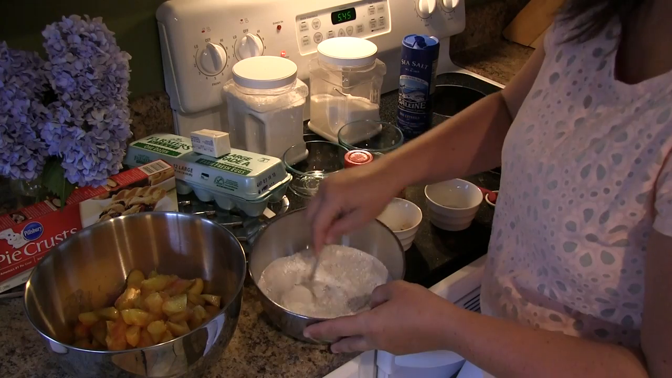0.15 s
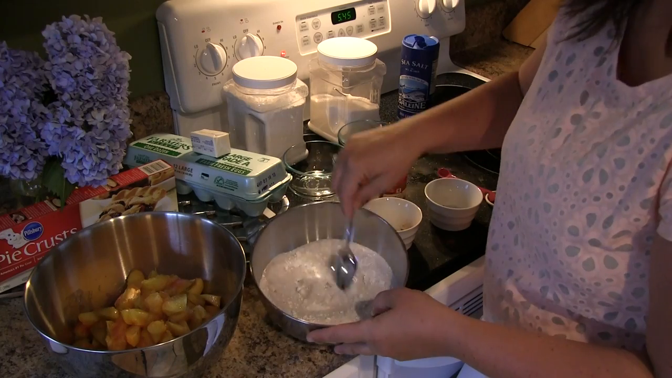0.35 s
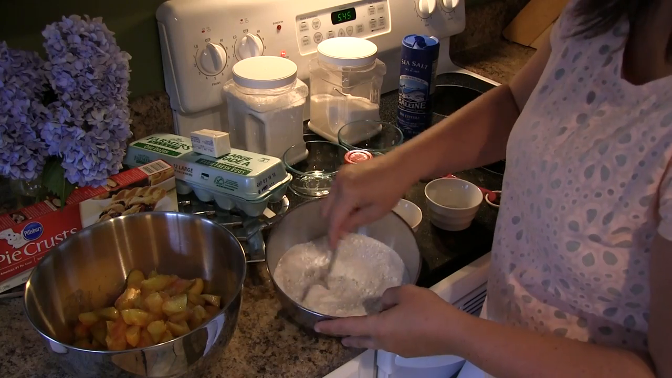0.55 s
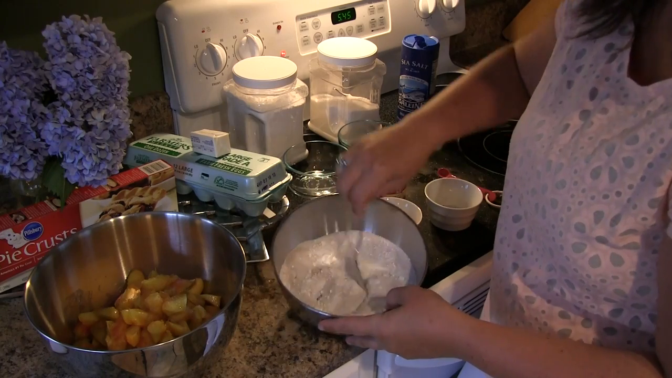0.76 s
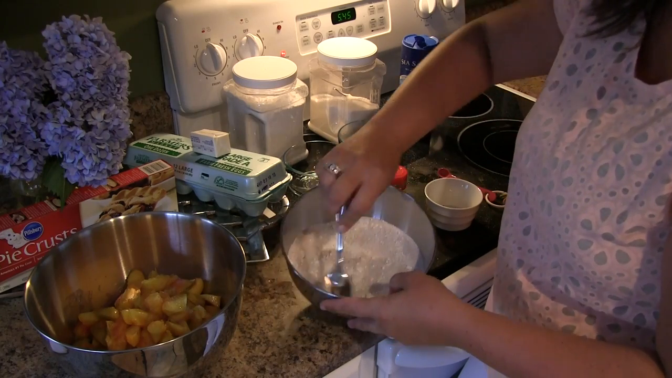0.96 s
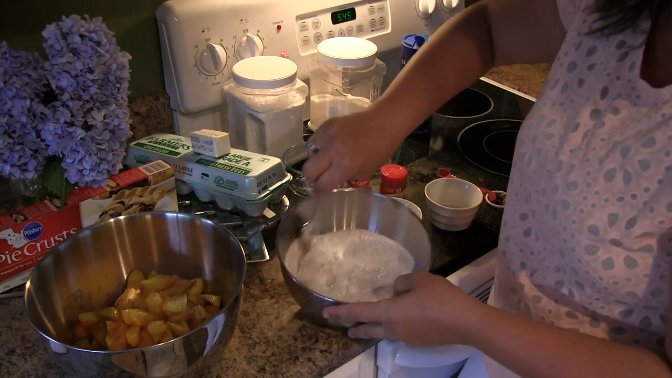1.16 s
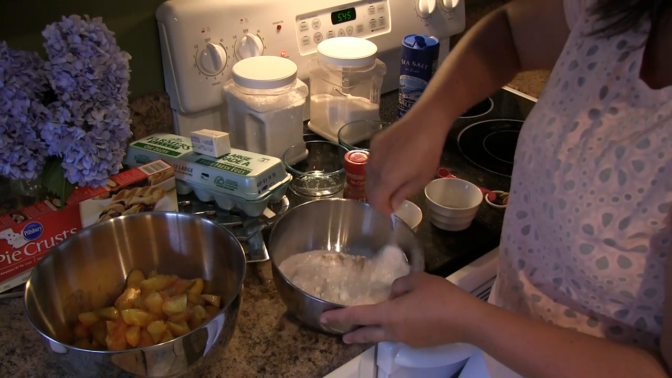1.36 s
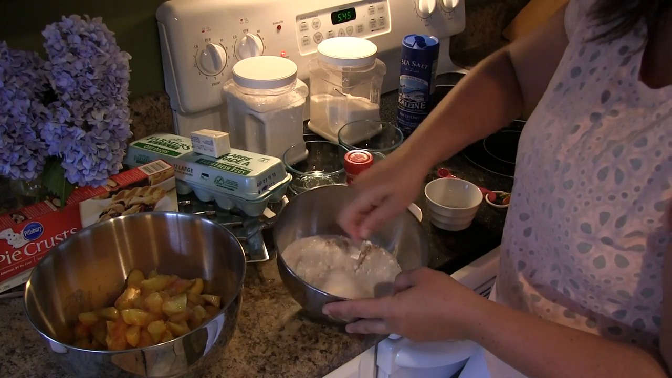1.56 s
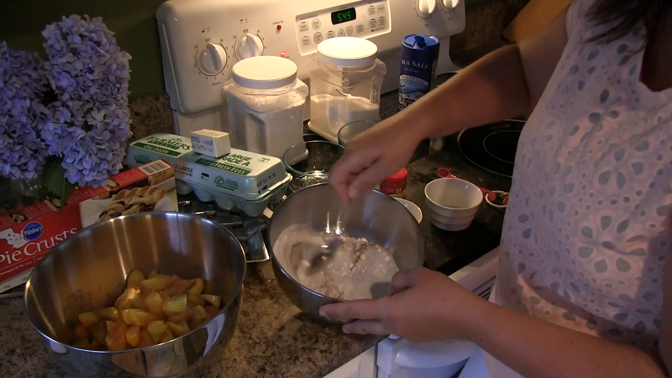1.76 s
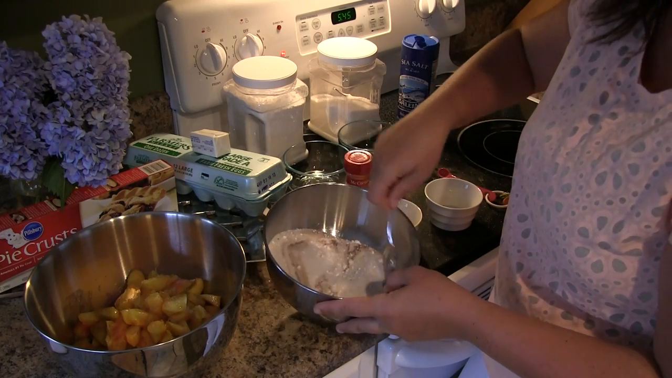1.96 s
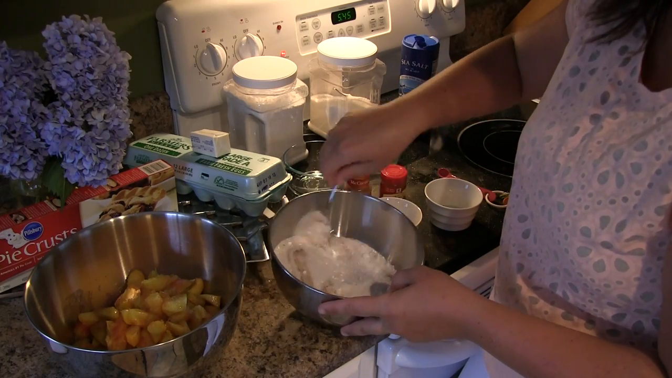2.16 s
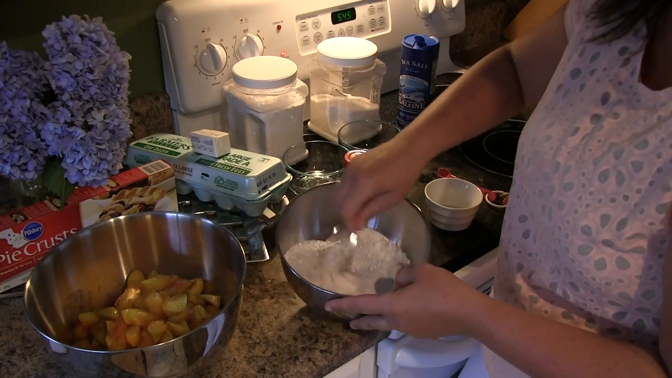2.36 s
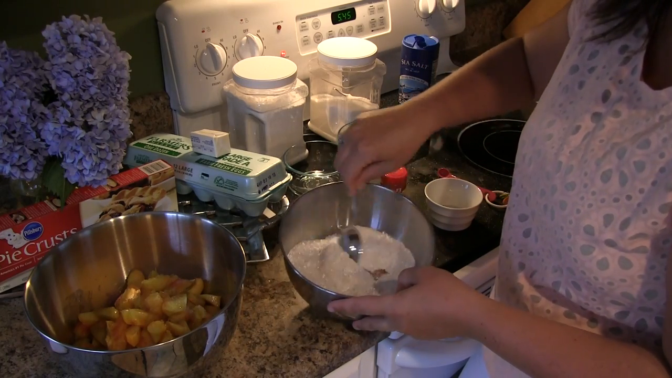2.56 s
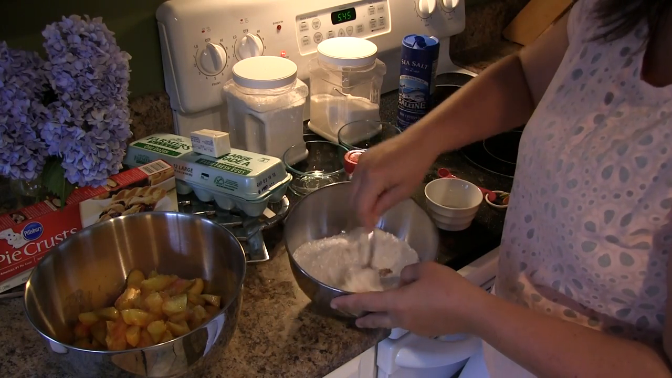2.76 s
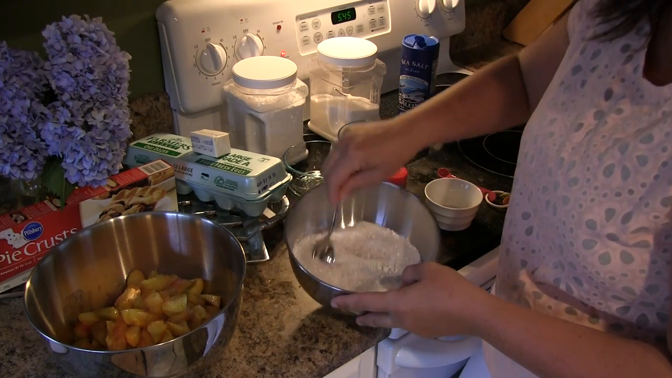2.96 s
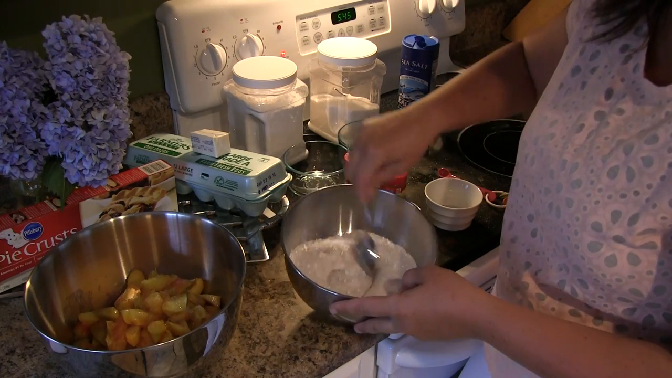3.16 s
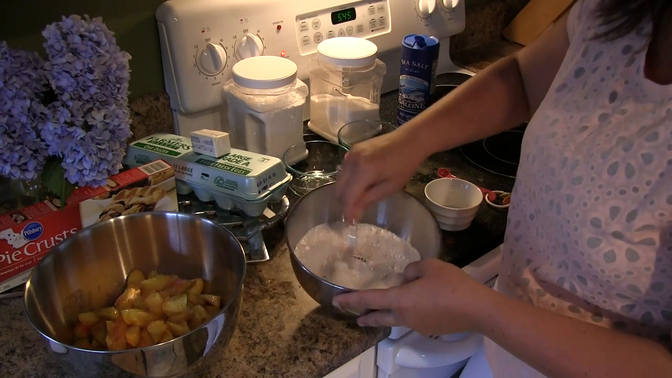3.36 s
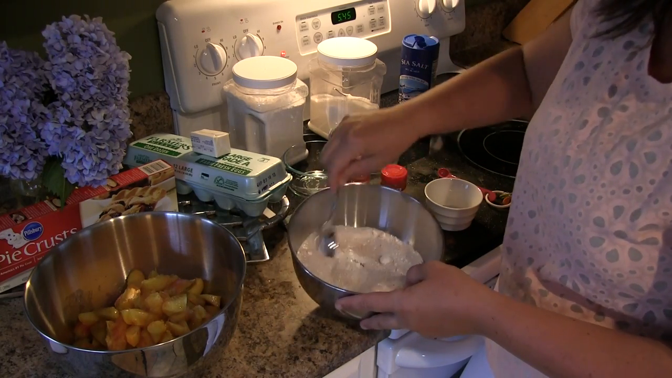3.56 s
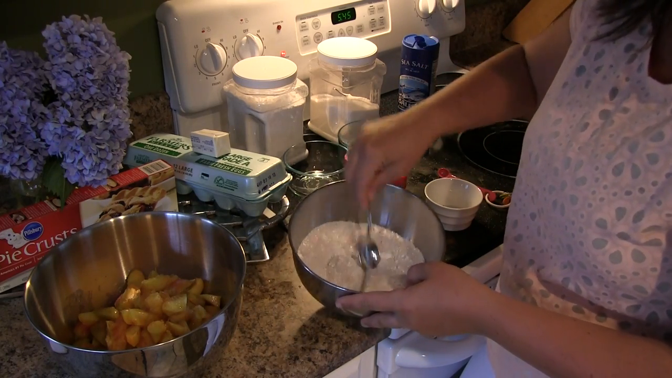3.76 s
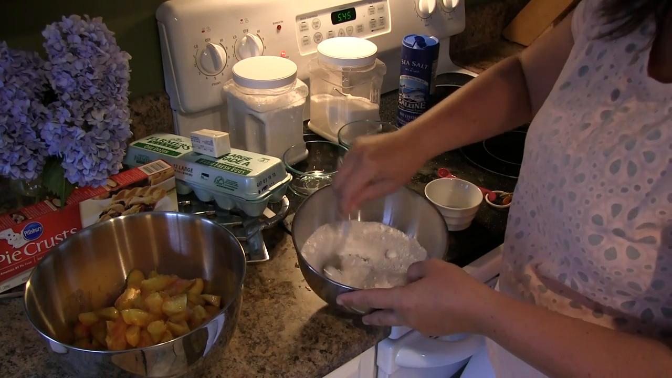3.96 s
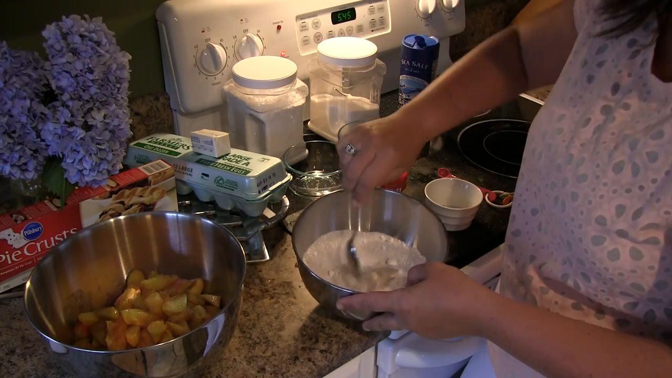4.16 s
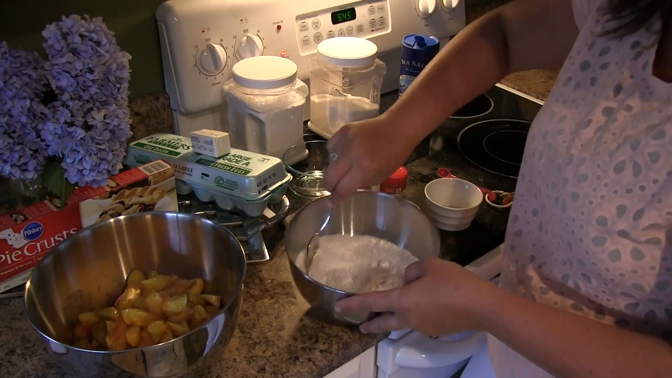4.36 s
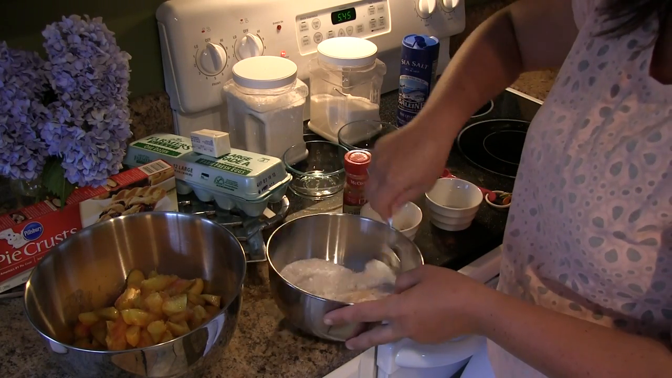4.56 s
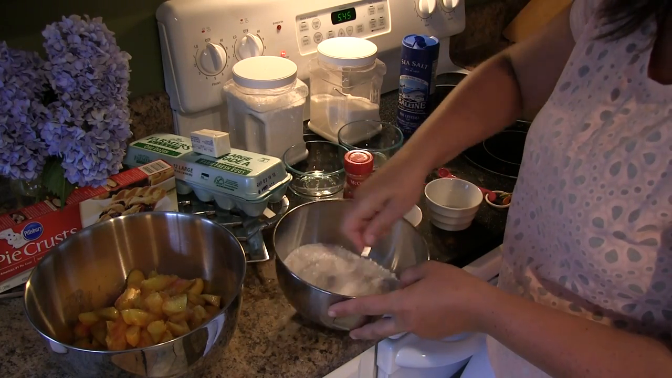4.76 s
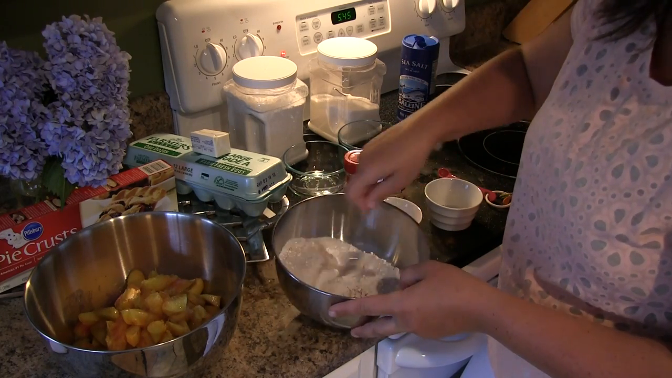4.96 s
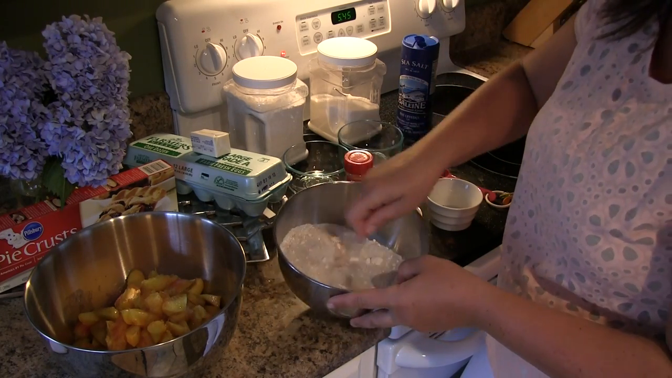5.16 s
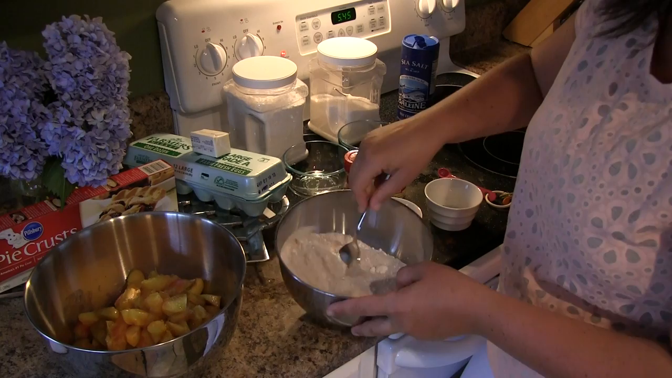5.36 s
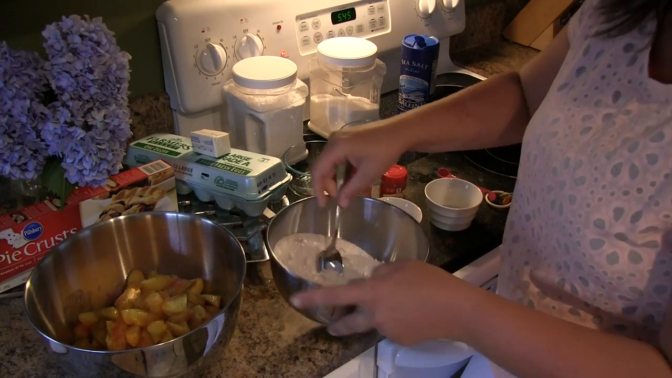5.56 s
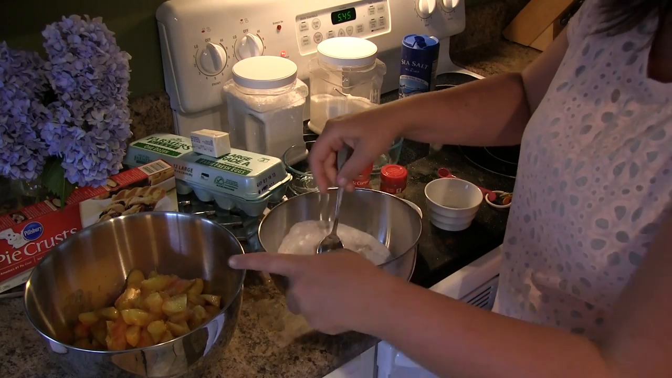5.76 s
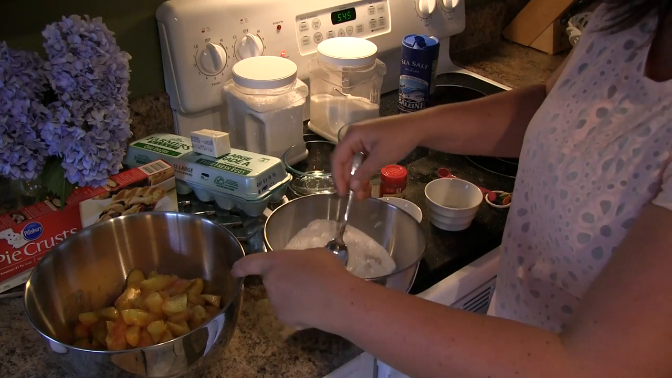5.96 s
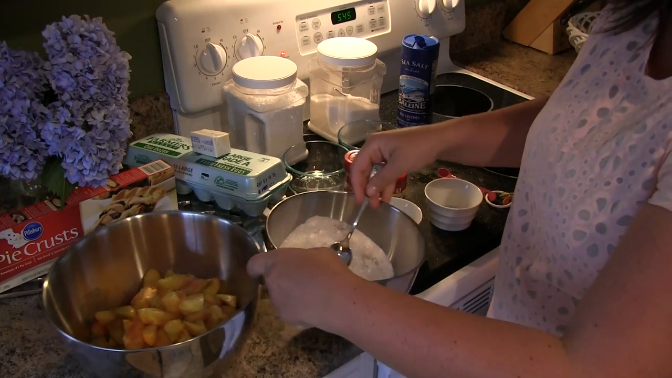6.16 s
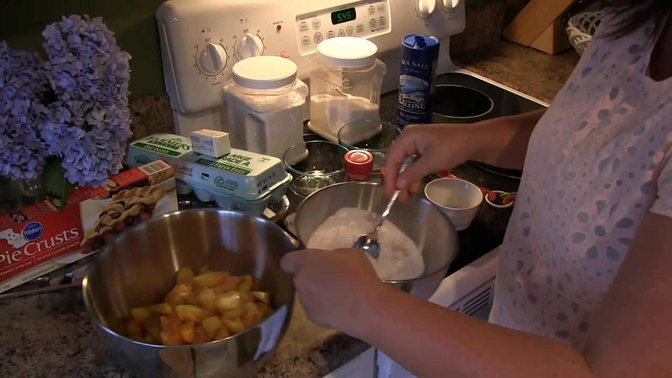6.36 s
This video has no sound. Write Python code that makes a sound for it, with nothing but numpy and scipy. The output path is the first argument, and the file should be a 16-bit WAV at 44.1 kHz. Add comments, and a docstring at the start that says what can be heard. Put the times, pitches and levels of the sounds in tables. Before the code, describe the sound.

Close in a quiet kitchen, a metal spoon stirs dry flour and sugar in a steel bowl. Quick gritty scrapes mix with sharp clinks and short bursts of bright, singing steel on steel. The strokes thin out after five seconds, a few faint ticks remain, then a larger bowl is softly nudged and dragged over the stone counter.

```python
"""In a quiet kitchen a metal spoon scrapes round a steel bowl of flour and sugar.
Snapping sugar grit and sharp catches of the spoon's edge excite damped modes of bottom, wall and edge.
Where steel slides bare on steel, stick-slip noise feeds clear partials and the bowl sings.
At the end a larger bowl is nudged (decaying low sines) and dragged over stone (coloured friction noise).
A diffuse room tail and a faint noise hush lie behind."""
import sys
import numpy as np
from scipy import signal
from scipy.fft import rfft, irfft
from scipy.io import wavfile
from scipy.ndimage import uniform_filter1d

SR = 44100
rng = np.random.default_rng(int(sys.argv[2]) if len(sys.argv) > 2 else 0)


def unload_wav(signal):
    """Save mono or channel-first audio to the path in sys.argv[1] as 16-bit WAV at rate SR, clipped to [-1, 1]."""
    wavfile.write(
        sys.argv[1],
        SR,
        np.round(np.clip(np.atleast_2d(signal).T, -1, 1) * 32767).astype(np.int16),
    )


N = 286650
TIME = np.arange(N) / SR  # s

# Spoon strokes: touch t/s, hardest t/s, ease-off t/s, then relative force at the hardest point
# on bottom level/dB, wall level/dB, grit level/dB
STROKE_FORCES = [(0, 0.062, 0.18, -26, -21, -33), (0.246, 0.337, 0.51, -38.5, -26, -40),
                 (0.386, 0.524, 0.61, -24.5, -21.5, -31.5), (0.633, 0.683, 0.79, -35.5, -31.5, -41),
                 (0.804, 0.86, 0.91, -36.5, -30, -52), (1.093, 1.1, 1.273, -32.5, -37, -24),
                 (1.274, 1.34, 1.7, -46.5, -31, -30.5), (1.61, 1.77, 1.786, -43, -47, -40.5),
                 (1.782, 1.811, 1.94, -72, -70, -49.5), (2.042, 2.05, 2.117, -27, -48, -23),
                 (2.133, 2.228, 2.35, -45, -22, -33), (2.273, 2.33, 3.08, -41.5, -36, -39.5),
                 (2.533, 2.593, 2.73, -42.5, -25.5, -33.5), (2.633, 2.667, 2.776, -42, -21.5, -28.5),
                 (2.8, 2.81, 2.93, -38, -34, -37.5), (2.863, 2.931, 3, -35, -23.5, -35.5),
                 (2.953, 3.01, 3.11, -33, -28.5, -28), (3.173, 3.198, 3.37, -37, -27.5, -37),
                 (3.235, 3.317, 3.38, -39, -33, -30), (3.397, 3.49, 3.54, -44.5, -36, -42),
                 (3.53, 3.572, 3.67, -34, -21.5, -31), (3.605, 3.642, 3.64, -47, -32.5, -30.5),
                 (3.71, 3.824, 3.9, -44, -32.5, -40.5), (3.856, 3.885, 3.98, -36.5, -24.5, -30),
                 (3.94, 3.974, 3.9, -57, -39, -31), (4.049, 4.154, 4.12, -49, -39, -41.5),
                 (4.386, 4.387, 4.42, -22, -33, -26.5), (4.446, 4.477, 4.97, -40.5, -24.5, -43),
                 (4.577, 4.602, 4.9, -49.5, -43.5, -30), (4.846, 4.944, 5.16, -40.5, -58, -41.5),
                 (5.051, 5.13, 5.21, -32.5, -28.5, -35), (5.265, 5.28, 5.42, -29, -30.5, -43),
                 (5.597, 5.63, 5.7, -40.5, -41.5, -53.5)]
# Force at touch and at ease-off, below the hardest point (dB); how fast contact begins and ends (s)
LEAN_IN_DB, EASE_DB, TOUCH_S, LIFT_S = -7.5, -14.5, 0.0062, 0.073
# Spans in which the spoon stays in the mix between strokes: dips in t/s, lifts out t/s
IMMERSIONS = [(0, 0.86), (1.096, 1.44), (2.04, 4.19), (4.39, 5.49)]
# Resting drag of the spoon: bottom level/dB, wall level/dB, grit level/dB
RESTING_FORCE = (-52, -44.5, -48)
# Edge catches and knocks: t/s, strength level/dB, brightness level/dB
EDGE_CATCHES = [(0.025, -8, -11.5), (0.036, -8.5, -9), (0.058, -6, -3.5), (0.071, -10.5, 0),
                (0.085, -12, 5), (0.11, -10, 5.5), (0.153, -19.5, 7), (0.251, -26, -2), (0.268, -23, 0.5),
                (0.299, -15.5, 5.5), (0.343, -19.5, 3), (0.38, -9.5, 4), (0.404, -21, -2),
                (0.456, -15, 5.5), (0.485, -8, -4), (0.524, -9, 0.5), (0.55, -7, 7), (0.582, -22, 1),
                (0.724, -23, 0.5), (0.832, -24, 0), (1.096, -8, 26), (1.148, -9, 12.5), (1.205, -18.5, 5),
                (1.236, -23, 2.5), (1.299, -18.5, 9), (1.323, -6, 12), (1.342, -5, 20), (1.366, -9, 18),
                (1.394, -8.5, 5.5), (1.409, -11.5, 14), (1.446, -9, 14), (1.483, -16, 15), (1.528, -30, 6),
                (1.557, -16.5, 12), (2.038, -5, 3.5), (2.074, -15, 14), (2.088, -14.5, 9), (2.243, -7.5, 7),
                (2.252, -15, 11.5), (2.393, -19, -1), (2.44, -21, -2.5), (2.509, -19.5, 13),
                (2.555, -16.5, 0), (2.593, -21.5, -2), (2.605, -14, 2), (2.629, -20, 6),
                (2.653, -11.5, 5.5), (2.662, -13, 4), (2.679, -18, 8), (2.699, -15, 0.5),
                (2.737, -11, -8.5), (2.795, -10.5, -12.5), (2.907, -15, 0), (2.92, -8, -2.5),
                (2.947, -12.5, 2.5), (3.004, -12.5, 4.5), (3.031, -7.5, -6.5), (3.065, -12.5, -16),
                (3.081, -14, -12), (3.131, -14.5, -5), (3.182, -18, 5), (3.235, -16, 2), (3.338, -10.5, 11),
                (3.55, -20, -2), (3.568, -8, 1), (3.613, -18.5, 14), (3.861, -17.5, -1), (3.884, -7.5, 0),
                (3.909, -10, 20), (4.159, -20.5, -1), (4.202, -15.5, -8), (4.392, -8, 4), (4.592, -8.5, 8),
                (4.692, -28, 12), (4.922, -23.5, -21), (5.009, -14.5, -5.5), (5.115, -13, 5),
                (5.137, -13.5, -0.5), (5.189, -21, -8), (5.271, -18.5, 0), (5.421, -22.5, -7),
                (5.432, -20.5, -9), (5.632, -20, -9), (5.659, -30, -2), (5.793, -31.5, -11),
                (5.859, -35, -9.5), (6.419, -23.5, 1.5)]
# How well a catch of brightness 0 passes into bottom, wall and edge: level/dB each, before normalising
CATCH_COUPLING = (-4.5, -1.5, -7.5)
# Brighter catches favour the edge, duller ones the bottom: change for bottom, wall, edge [dB per dB]
BRIGHTNESS_SLOPE = (-1.02, 0, 1.17)
# Damped modes of the bowl bottom: f/Hz, width f/Hz, level/dB
BOTTOM_MODES = [(220, 380, -7), (510, 110, -6), (620, 90, -1.5), (715, 90, 1.5), (816, 80, -3),
                (920, 120, -6), (1170, 110, -2), (1275, 80, -1.5), (1446, 130, -2.5)]
# Damped modes of the bowl wall: f/Hz, width f/Hz, level/dB
WALL_MODES = [(1640, 200, -8), (1935, 286, -3.5), (2190, 160, -6.5), (2296, 154, -4.5), (2480, 480, -1),
              (2816, 145, -2.5), (3020, 180, -6), (3247, 270, -5.5), (4100, 600, -7), (4750, 340, -9),
              (6430, 1130, -9)]
# Damped modes of the spoon edge: f/Hz, width f/Hz, level/dB
EDGE_MODES = [(7850, 1200, 0), (8300, 260, -3.5), (9210, 860, 9), (10050, 140, -3.5), (10400, 360, -7.5),
              (11450, 160, -2.5), (13380, 470, -3)]
# Spectrum of the crunch heard directly: f/Hz, level/dB per Hz
GRIT_SPECTRUM = [(3000, -18.5), (4500, -9.5), (6000, -12), (9000, -4.5), (13000, -11), (16000, -16.5)]
# Passages of bare steel on steel, each with rows: t/s, gliding partial level/dB, its pitch f/Hz,
# low fixed partials level/dB, high fixed partials level/dB
SINGING_PASSAGES = [
    [(1.095, -50, 2150, -42, -40), (1.154, -46, 2030, -39, -45), (1.25, -38, 2380, -48, -41),
     (1.29, -47, 2380, -52, -42), (1.33, -42, 2000, -43, -41), (1.41, -42, 2080, -41, -45),
     (1.48, -39, 2250, -43, -43), (1.554, -40, 2120, -46, -54), (1.62, -60, 2100, -58, -62)],
    [(2.037, -44, 2040, -36, -50), (2.094, -26, 2040, -38, -50), (2.13, -48, 2040, -47, -55),
     (2.28, -42, 2200, -48, -54), (2.5, -45, 2280, -48, -56)],
    [(4.392, -46, 2300, -35, -45), (4.43, -49, 2150, -44, -54), (4.488, -38, 2180, -44, -54),
     (4.57, -47, 1980, -46, -50), (4.69, -41, 2250, -44, -40), (4.748, -36, 2160, -50, -43),
     (4.86, -55, 2070, -55, -58)],
]
# Low fixed partials of the singing: f/Hz, width f/Hz, level/dB
LOW_PARTIALS = [(690, 100, 1), (1290, 90, -3), (1400, 80, 0), (2860, 80, -2), (3800, 120, -9)]
# High fixed partials of the singing: f/Hz, width f/Hz, level/dB
HIGH_PARTIALS = [(4800, 110, 0), (5050, 130, -2), (7100, 250, -6)]
# Free ring of the spoon, a row for each pitch: level/dB, t60/s
SPOON_RING = [(-20, 0.56), (-9.5, 0.024), (-34.5, 0.13)]
# Pitches of that ring: f/Hz each
SPOON_PITCHES = (2848, 620, 240)
RING_S, RING_END_S = 2.795, 2.925  # the spoon strikes the wall and rings until it touches again
# Thumps of the counter under the nudged bowl: t/s, level/dB, t60/s
COUNTER_THUMPS = [(6.024, -40, 0.23), (6.109, -49, 0.41), (6.429, -34.5, 0.2)]
NUDGE_HZ = 102
# Sliding of the larger bowl: t/s, level/dB
DRAG_LEVEL = [(6.13, -63), (6.16, -50.5), (6.27, -38), (6.5, -34.5)]
# Spectrum of that sliding: f/Hz, level/dB per Hz
DRAG_SPECTRUM = [(35, -32), (130, -11), (540, 1.5), (770, -3.5), (860, -11.5), (2200, -24.5), (2660, -13.5),
                 (3700, -25.5), (4750, -23.5), (5600, -24.5), (12000, -42.5)]
# Spectrum of the kitchen hush: f/Hz, level/dB per Hz
HUSH_SPECTRUM = [(15, -61), (30, 2), (58, 3), (135, 1.5), (260, -8.5), (450, -3.5), (1000, -12.5),
                 (3000, -16), (6000, -23.5), (12000, -23), (16500, -29)]
HUSH_DB, BAND_LIMIT_HZ = -56, 15950


def stirring():
    """Forced vibration: crunch and catches drive the bowl bottom, the wall, the spoon edge and the air."""
    bottom_force, wall_force, grit_force = strokes()
    thud, knock, tick = catches()
    # 1 where no flour lies between spoon and bowl
    bare = sum((TIME > table[0][0]) & (TIME < table[-1][0]) for table in SINGING_PASSAGES)
    muffled = 1 - .75 * uniform_filter1d(1. * bare, size=1500)

    # All four crunches share one slip pattern; edge and air add a finer one
    shared = slips(per_s=90, swell_db=3, ms=5)
    fine = slips(per_s=170, swell_db=2.5, ms=3.5)
    low = crunch(shared, per_s=1300, spread_db=1.5, smooth=0.35)
    mid = crunch(shared, per_s=1300, spread_db=1.5, smooth=0.35)
    edge = crunch(np.sqrt(shared) * fine, per_s=1800, spread_db=1.2, smooth=0.8)
    air = crunch(np.sqrt(shared) * fine, per_s=1800, spread_db=1.2, smooth=0.8)

    bottom = ringing(low * bottom_force + thud, BOTTOM_MODES, wander_db=3.5)
    wall = ringing((mid * wall_force + knock) * muffled, WALL_MODES, wander_db=4, per_s=25)
    hiss = ringing(edge * grit_force + tick, EDGE_MODES, wander_db=6, per_s=40)
    direct = coloured(air * grit_force + 0.22 * tick, GRIT_SPECTRUM)
    direct /= np.std(coloured(air, GRIT_SPECTRUM))

    song = singing(knock * bare, thud * bare)
    bowl = above(gain_of(1.5) * bottom + song, hz=237)
    bowl += gain_of(2.5) * above(wall, hz=1030)
    bowl += gain_of(-0.5) * above(hiss, hz=4400)
    return bowl + gain_of(-1.0) * direct * np.sqrt(muffled)


def strokes():
    """Addition of powers: each stroke leans in, peaks and eases off; overlapping forces add in power."""
    power = np.zeros((3, N))
    shapes = [([touch, top, ease], [LEAN_IN_DB, 0, EASE_DB], db)
              for touch, top, ease, *db in STROKE_FORCES]
    shapes += [(run, [0, 0], RESTING_FORCE) for run in IMMERSIONS]
    for times, steps_db, db in shapes:
        times = [times[0] - TOUCH_S, *times, times[-1] + LIFT_S]
        shape = gain_of(np.interp(TIME, times, [-50, *steps_db, -50], left=-200, right=-200))
        power += (gain_of(db)[:, None] * shape) ** 2
    return np.sqrt(power)


def catches(decay_ms=4.77, rise_ms=1.36):
    """Impulsive excitation: each catch is a dying noise burst shared among bottom, wall and edge."""
    out = np.zeros((3, N))
    ms = 1000 * np.arange(1500) / SR
    envelope = np.exp(-ms / decay_ms) * np.minimum(ms / rise_ms, 1)
    for s, db, bright_db in EDGE_CATCHES:
        burst = envelope * np.clip(rng.standard_normal(1500), -1.5, 1.5)
        share = gain_of(np.add(CATCH_COUPLING, bright_db * np.array(BRIGHTNESS_SLOPE)))
        share /= np.linalg.norm(share)  # brightness leaves the total power alone
        for part, g in zip(out, share):
            add(part, s, gain_of(db) * g * burst)
    return out


def crunch(clumps, per_s, spread_db, smooth):
    """Brittle fracture: crystals snap at random with uneven sizes over sifting flour."""
    size = gain_of(spread_db * np.minimum(rng.exponential(1, N), 4)) * rng.standard_normal(N)
    snaps = evened(size * (rng.random(N) < per_s / SR))
    sifting = smooth * rng.standard_normal(N)
    return evened(clumps * (snaps + sifting))


def slips(per_s, swell_db, ms):
    """Stick-slip friction: random kicks change the gain quickly, and the change dies away."""
    kicks = rng.exponential(1, N) ** 2 * (rng.random(N) < per_s / SR)
    decay = np.exp(-1000 / (ms * SR))
    swells = signal.lfilter([1], [1, -decay], uniform_filter1d(kicks, size=130))
    # dB per e-fold of swell; a negative swell_db turns swells into dips
    return gain_of(swell_db * np.log(.5 + abs(swells)))


def singing(knock, thud):
    """Friction-driven resonance: slips and catches feed clear partials; one glides as the spoon tilts."""
    rows = np.concatenate(SINGING_PASSAGES)
    clumps = slips(per_s=89, swell_db=4.0, ms=7.2)
    rub, grind, rasp = (crunch(clumps, per_s=1400, spread_db=3.5, smooth=0.85) for _ in range(3))
    glide_level, low_level, high_level = (
        sum(follow(table, index=k) for table in SINGING_PASSAGES) for k in (1, 3, 4))

    hz = np.interp(TIME, rows[:, 0], rows[:, 2])
    glide = resonate(rub * glide_level + 0.45 * knock, hz, width=133)
    high = ringing(rasp * high_level + .15 * knock, HIGH_PARTIALS, wander_db=2)
    low = ringing(grind * low_level + 0.68 * thud + 0.47 * knock, LOW_PARTIALS, wander_db=2)
    return glide + above(high, hz=3500) + low


def ringing(x, modes, wander_db, per_s=14):
    """Modal superposition: damped modes trade strength as the contact moves, at constant summed power."""
    hz, width, db = np.transpose(modes)
    knots = np.linspace(0, N, int(per_s * N / SR))
    weights = gain_of(db[:, None] + wander_db * rng.standard_normal((len(modes), len(knots))))
    weights /= np.linalg.norm(weights, axis=0)
    out = np.zeros(N)
    radius = np.exp(-np.pi * width / SR)
    turn = 2 * np.pi * hz / SR
    for k, (r, angle, weight) in enumerate(zip(radius, turn, weights)):
        # neighbouring modes alternate in sign
        scale = (-1) ** k * np.sqrt(1 - r ** 2) * np.sin(angle)
        push = scale * np.interp(np.arange(N), knots, weight) * x
        out += signal.lfilter([1], [1, -2 * r * np.cos(angle), r ** 2], push)
    return out


def resonate(x, hz, width):
    """Moving resonance: a damped mode follows the curve hz, scaled so that white noise keeps its level."""
    turn = np.exp(2j * np.pi * np.cumsum(hz * np.ones(N)) / SR)
    r = np.exp(-np.pi * width / SR)
    # shift the pitch down to zero, smooth there, and shift back
    slow = signal.lfilter([1], [1, -r], x / turn)
    return np.sqrt(2 * (1 - r * r)) * (turn * slow).real


def above(x, hz):
    """Radiation cut-off: a small body radiates little below its lowest modes."""
    return signal.sosfilt(signal.butter(2, hz, "high", fs=SR, output="sos"), x)


def decaying_sine(hz, db, t60, t):
    """Free damped oscillation: a sine whose level falls 60 dB in t60 seconds."""
    return gain_of(db - 60 * t / t60) * np.sin(2 * np.pi * hz * t)


def spoon_ring():
    """Free vibration: the struck spoon rings at its own pitches until contact damps it."""
    out, t = np.zeros(N), np.arange(SR // 2) / SR
    free = np.clip((RING_END_S - RING_S - t) / 0.02, 0, 1)
    for hz, (db, t60) in zip(SPOON_PITCHES, SPOON_RING):
        add(out, RING_S, free * decaying_sine(hz, db, t60, t))
    return above(out, hz=90)


def counter_thumps():
    """Impact response: each nudge sets the counter into a low damped oscillation."""
    out, t = np.zeros(N), np.arange(SR // 2) / SR
    for s, db, t60 in COUNTER_THUMPS:
        add(out, s, decaying_sine(NUDGE_HZ, db, t60, t))
    return out


def drag():
    """Sliding friction: a steel base rubs over stone, giving rough noise with a fixed spectrum."""
    rub = crunch(slips(per_s=270, swell_db=-0.5, ms=3.0), per_s=1800, spread_db=2.0, smooth=1.0)
    return evened(coloured(rub, DRAG_SPECTRUM)) * follow(DRAG_LEVEL, index=1)


def kitchen(x, t60=0.3):
    """Reverberation: an exponentially decaying diffuse tail, duller than the source."""
    t = np.arange(SR // 2) / SR
    diffuse = signal.lfilter([1], [1, -.5], rng.standard_normal(len(t)))
    tail = diffuse * gain_of(-60 * t / t60) * (t > .004)
    return signal.oaconvolve(x, tail / np.linalg.norm(tail))[:N]


def hush():
    """Stationary background noise: random pressure with the kitchen's spectrum at a steady level."""
    return gain_of(HUSH_DB) * evened(coloured(rng.standard_normal(N), HUSH_SPECTRUM))


def coloured(x, points):
    """Linear filtering: x is shaped by a spectrum given on a log-frequency axis."""
    hz, db = np.transpose(points)
    f = np.fft.rfftfreq(N, 1 / SR)
    return irfft(rfft(x) * gain_of(np.interp(np.log(f + 1), np.log(hz + 1), db)), N)


def follow(rows, index):
    """Level interpolation: gain over time from one dB column, at -120 dB outside the table."""
    rows = np.asarray(rows)
    return gain_of(np.interp(TIME, rows[:, 0], rows[:, index], left=-120, right=-120))


def gain_of(db):
    """Decibel law: amplitude ratio of a level."""
    return 10 ** (np.asarray(db) / 20)


def evened(x):
    """Normalisation: x at unit root-mean-square amplitude."""
    return x / np.sqrt(np.mean(x ** 2) + 1e-20)


def add(mix, s, sound):
    """Superposition: sound is added into mix from s seconds on."""
    part = mix[round(s * SR):][:len(sound)]
    part += sound[:len(part)]


def scene():
    """Superposition of the near sources, their room tail and the hush."""
    near = stirring() + spoon_ring() + counter_thumps() + drag()
    return (near + gain_of(-13) * kitchen(near) + hush())[None]


def record(dry, ceiling=1.0):
    """Saturation and band limiting: peaks are softly clipped, then a low-pass ends the treble."""
    soft = ceiling * np.tanh(dry / ceiling)
    low_pass = signal.firwin(511, BAND_LIMIT_HZ, window=("kaiser", 9), fs=SR)
    return signal.oaconvolve(soft, low_pass[None], "same")


dry = scene()
out = record(dry)
unload_wav(out)
```